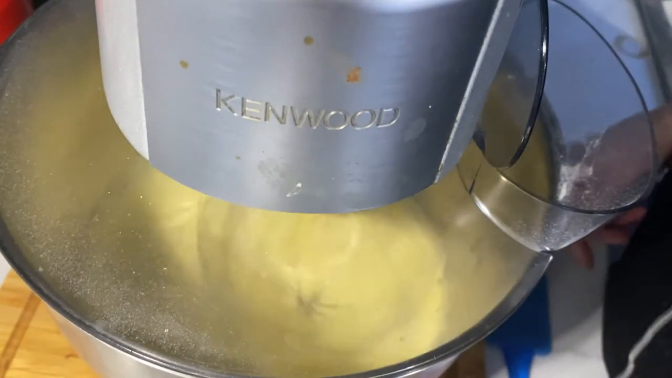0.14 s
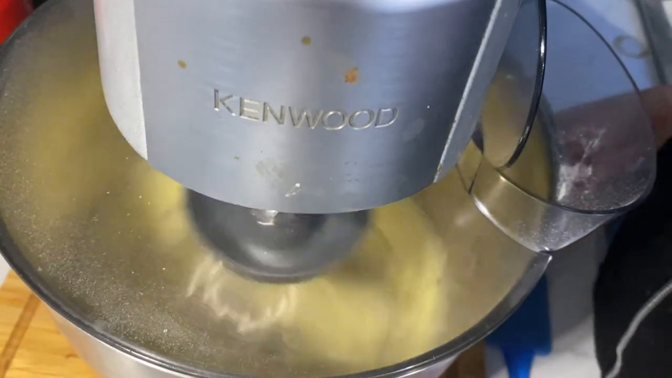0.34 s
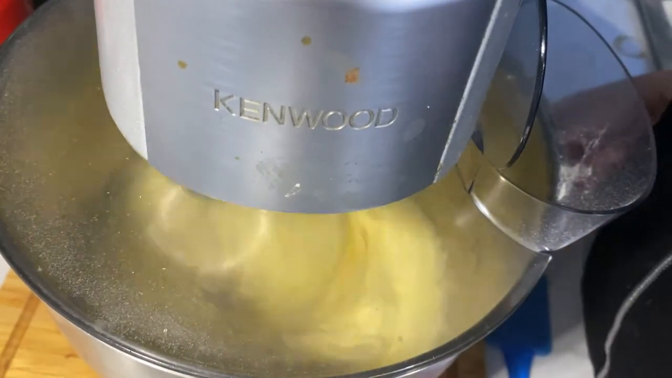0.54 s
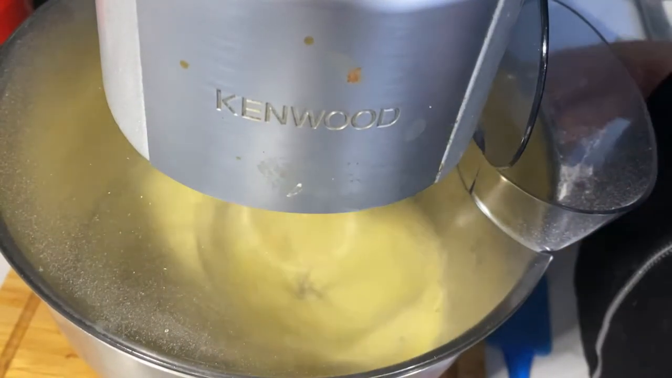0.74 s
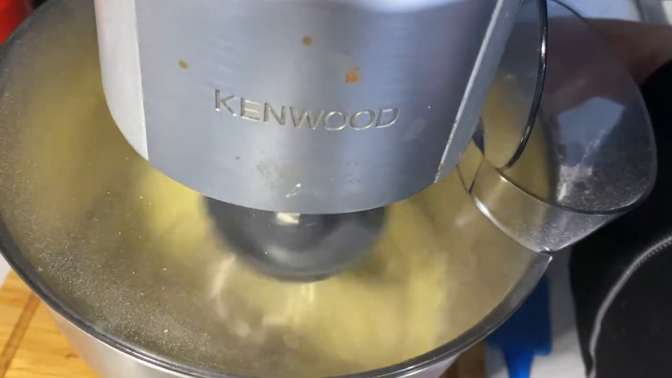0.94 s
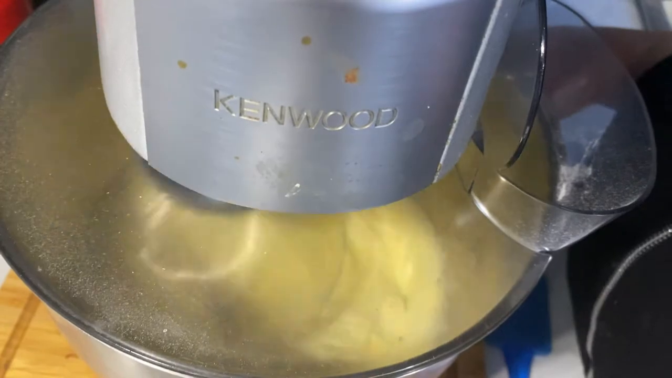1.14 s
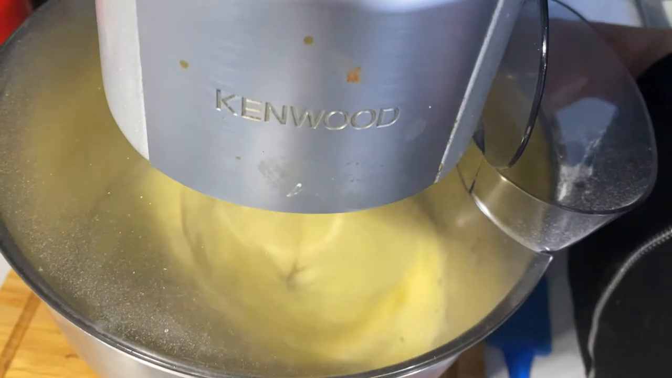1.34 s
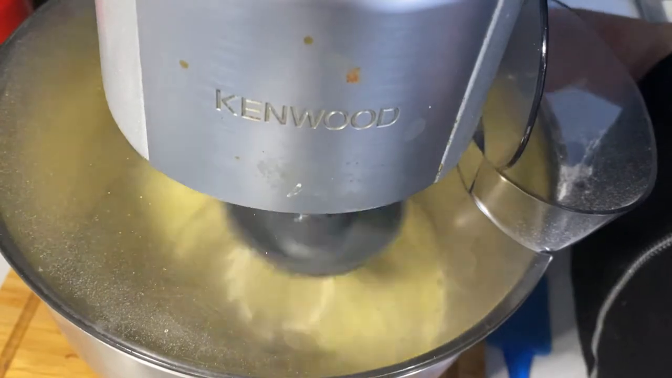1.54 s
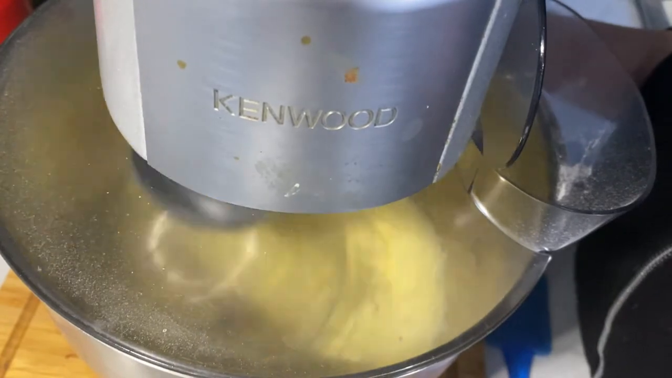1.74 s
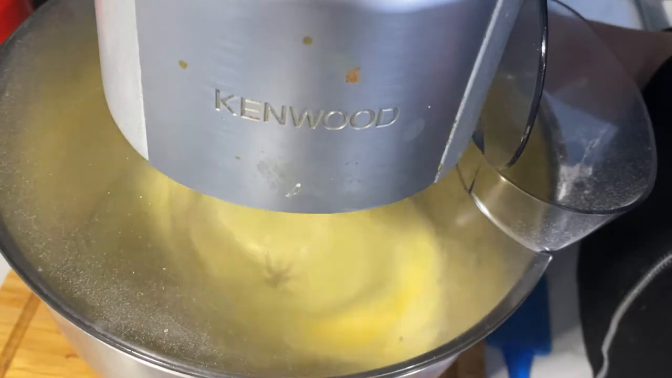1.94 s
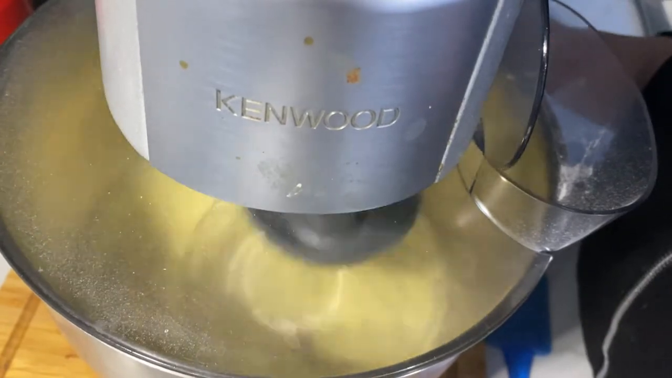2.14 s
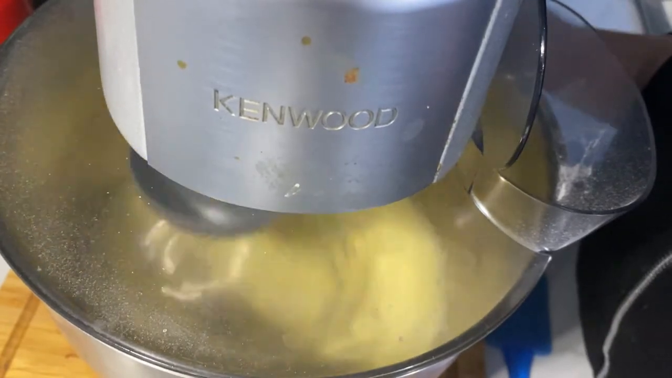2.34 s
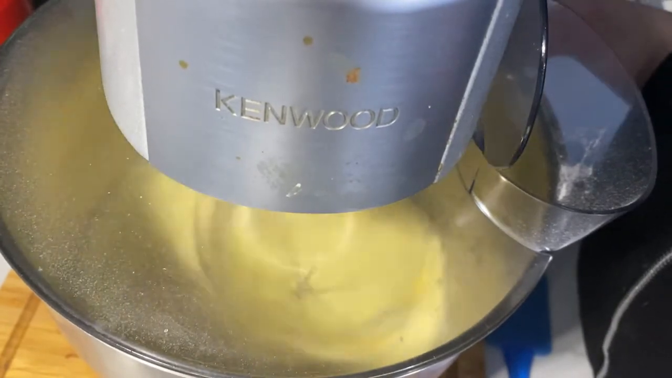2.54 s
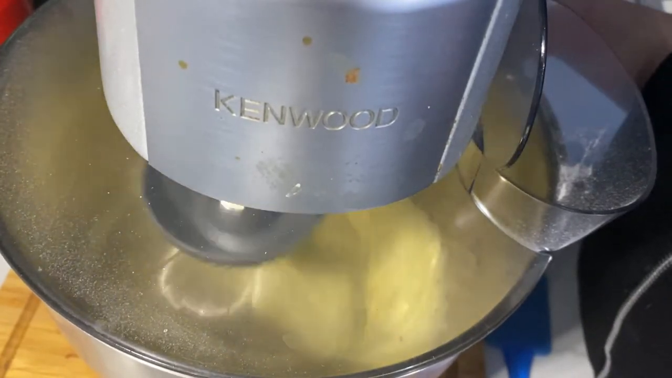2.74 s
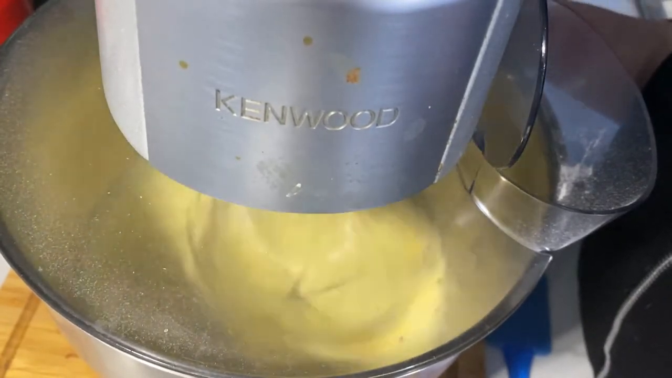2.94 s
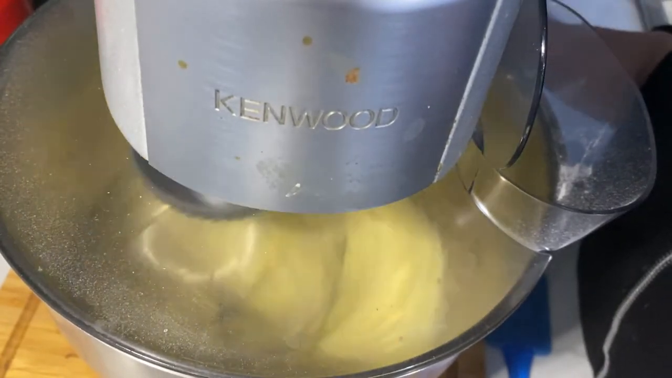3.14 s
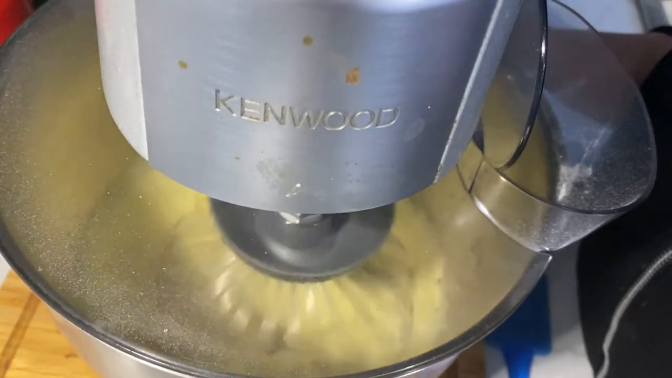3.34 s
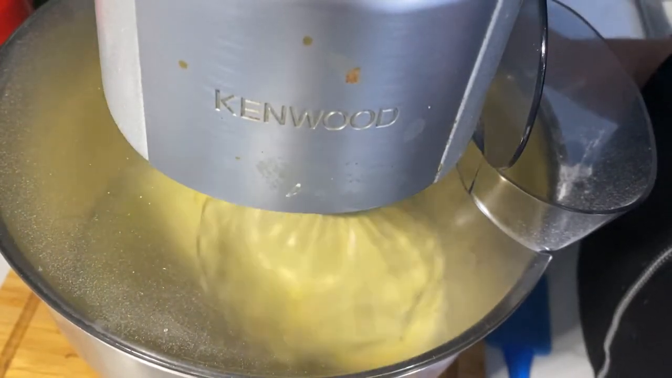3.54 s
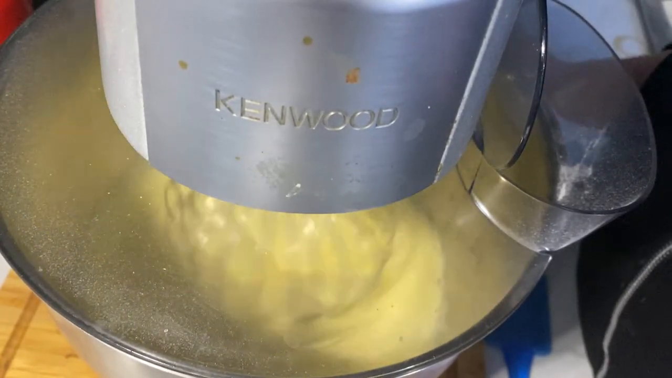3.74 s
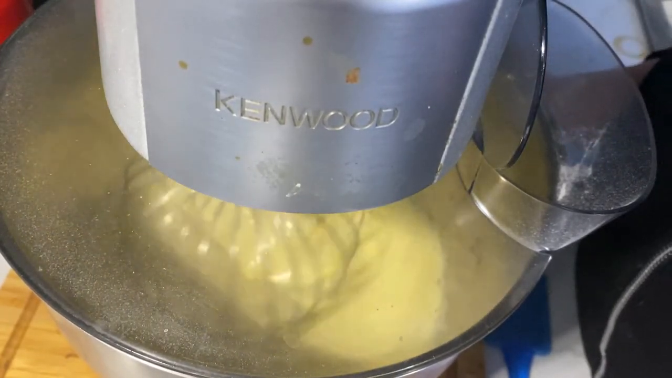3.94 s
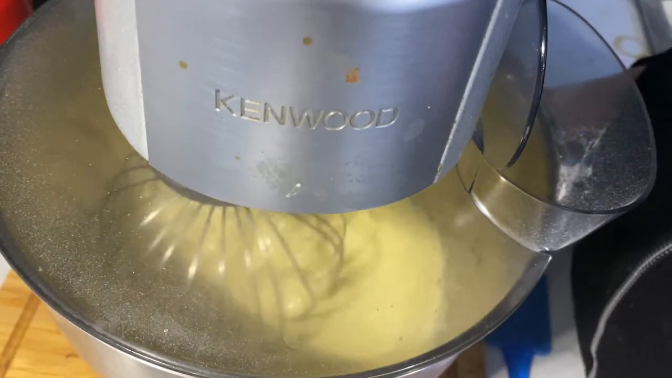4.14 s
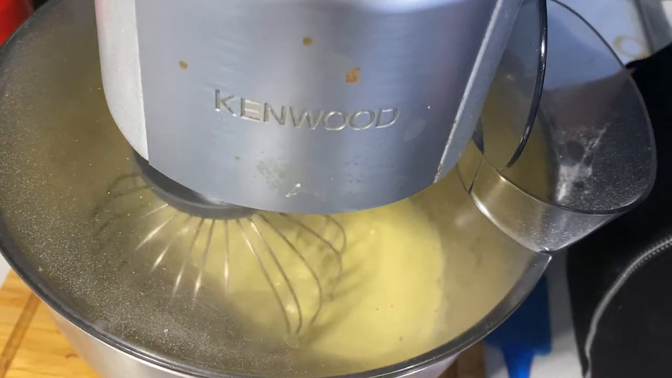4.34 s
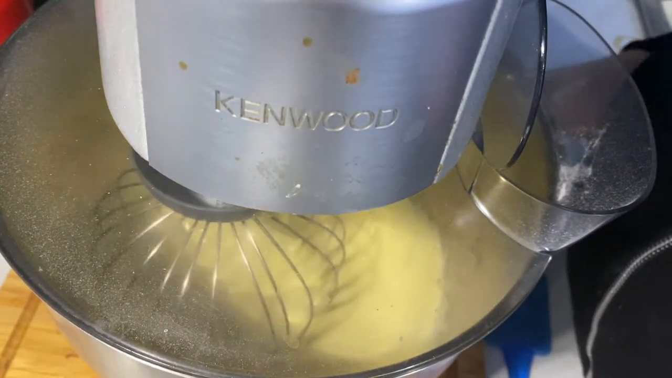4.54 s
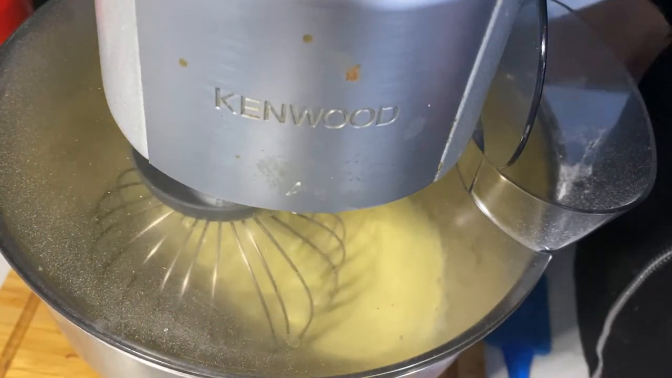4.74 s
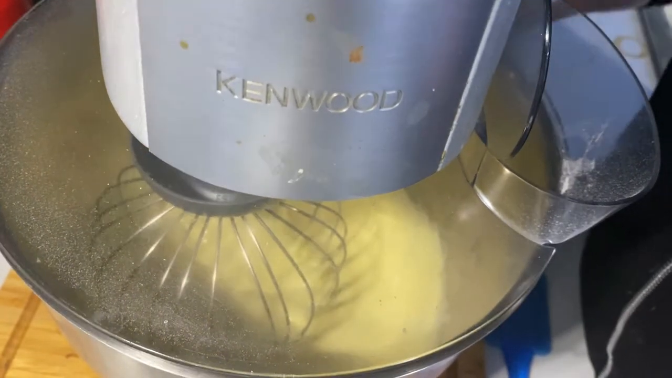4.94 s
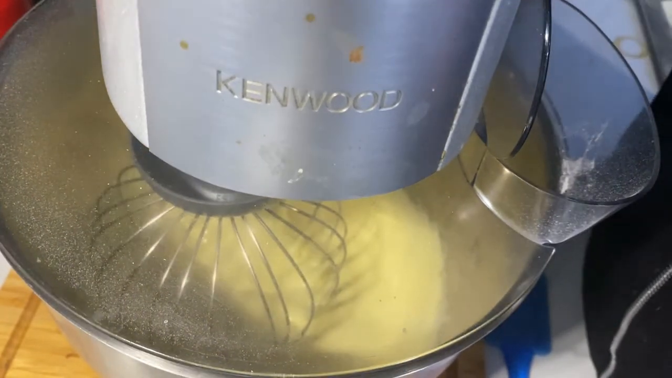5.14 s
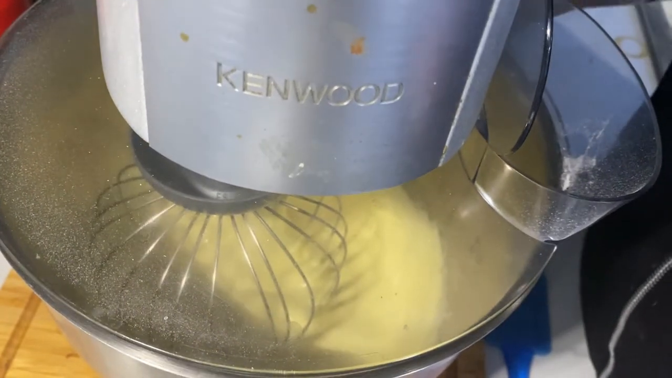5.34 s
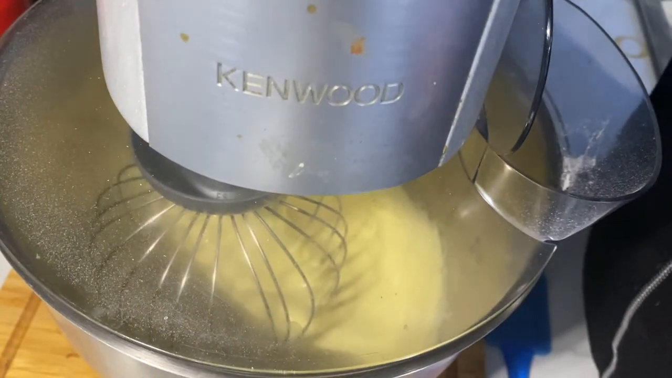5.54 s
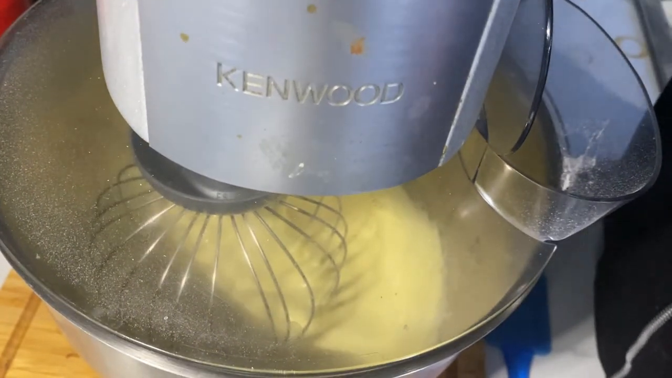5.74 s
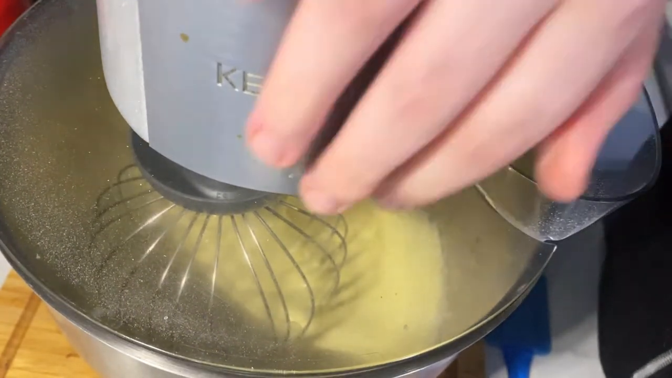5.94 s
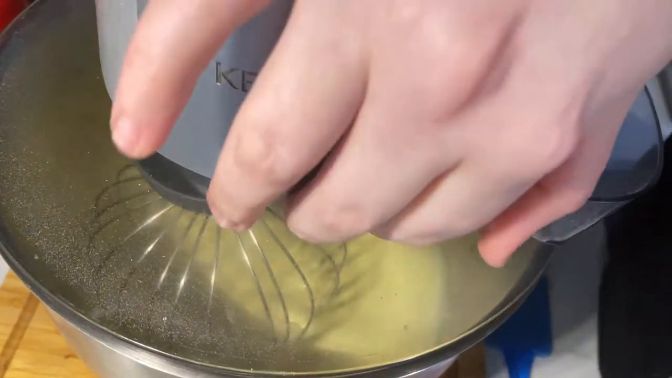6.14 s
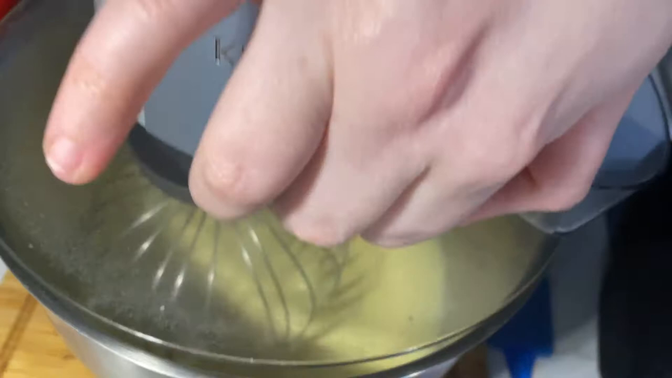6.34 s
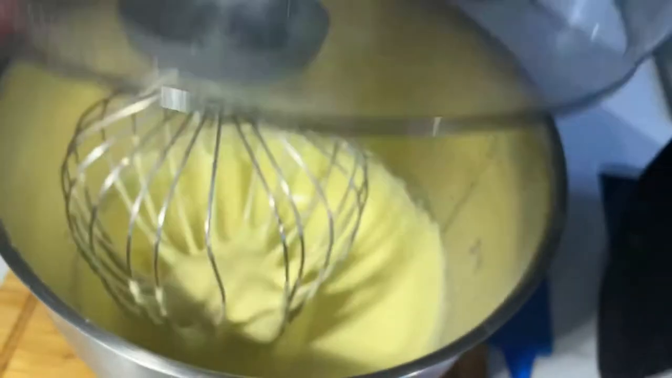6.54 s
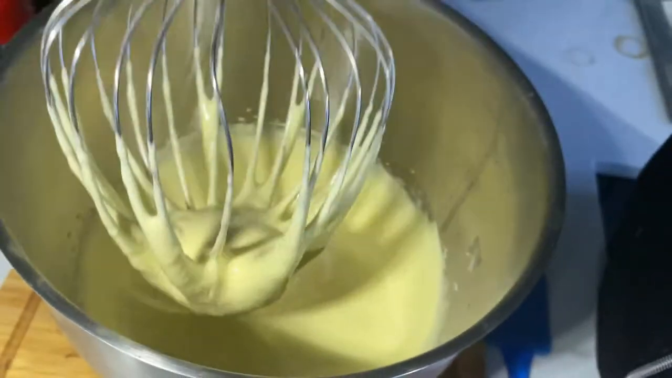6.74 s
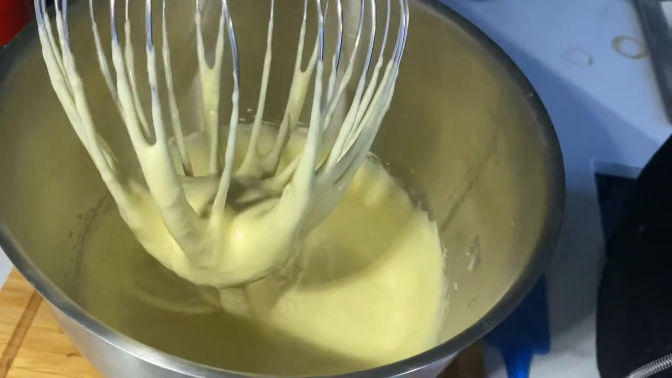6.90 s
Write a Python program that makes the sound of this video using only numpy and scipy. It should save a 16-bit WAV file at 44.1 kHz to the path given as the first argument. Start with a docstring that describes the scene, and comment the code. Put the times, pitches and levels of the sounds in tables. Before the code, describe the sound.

From the start, a stand mixer whisks batter at full speed, close by on a kitchen counter: a loud, steady roar with a motor whine, high hiss and low rumble. At about 2.3 seconds the power goes off. The whine weakens and slides down in pitch, and the roar gradually fades, with gear chatter, light ticking, a falling buzz and a brief low groan through the counter. A thin, high ring lingers until the motor stops at about 4.5 seconds. A run of small plastic dial clicks follows until 5 seconds, then a sharper click from the release catch at 5.3. From about 5.7 seconds, hands faintly rub the splash guard and casing, with soft low bumps. Around 6.7 seconds come a hollow knock, two light clicks and a short scrape as the head lifts. The room behind is very quiet.

```python
"""A stand mixer roars and whines at full speed, whisking batter on a kitchen counter.
Its spinning shaft drives the fan, gears and whisk and shakes the counter, so when the dial is turned
down the tones slide lower and the roar fades until the motor stops. Hands then click the release,
brush the casing and lift the head. It is all heard through a nearby phone's two microphone ports."""
import sys
import numpy as np
from scipy import signal
from scipy.fft import rfft, irfft
from scipy.io import wavfile
from scipy.ndimage import uniform_filter1d

SR = 44100
rng = np.random.default_rng(int(sys.argv[2]) if len(sys.argv) > 2 else 0)


def output_pcm(signal):
    """Save a mono or channel-first signal as 16-bit PCM at the path in sys.argv[1].

    Samples are clipped to [-1, 1] before scaling.
    """
    pcm = np.clip(np.atleast_2d(signal).T, -1, 1) * 32767
    wavfile.write(sys.argv[1], SR, np.round(pcm).astype(np.int16))


N = 311781
T = np.arange(N) / SR
HZ = np.arange(N // 2 + 1) * SR / N + 1e-3

# how fast the motor shaft spins: (time [s], speed [turns/s])
SHAFT_SPEED = [(0, 226.8), (2.27, 226.8), (2.44, 198), (2.62, 180), (2.78, 171), (2.95, 154), (3.11, 132),
               (3.27, 114.5), (3.54, 88), (3.7, 74), (3.906, 51), (4.092, 34.2), (4.2, 24.7), (4.26, 20.2),
               (4.3, 17.4), (4.38, 11), (4.48, .5)]
# tone colour of the roar, its hiss, its rumble and the quiet room: (frequency [Hz], level [dB])
ROAR_COLOUR = [(240, -39.5), (380, -6), (440, -8.5), (560, -6), (668, -3.5), (750, -5), (921, -3.5),
               (1430, -6), (2320, -5), (4190, -12), (7470, -9.5), (8600, -20.5), (11200, -93),
               (18900, -120)]
HISS_COLOUR = [(7000, -30), (8500, -33.5), (10000, 13), (12000, 11), (15000, 4.5), (16400, -4)]
RUMBLE_COLOUR = [(25, -53.5), (38, -17), (50, -15.5), (80, -2.5), (110, 1), (135, -11), (190, -0.5),
                 (260, -10.5), (340, -5.5), (450, -22), (600, -61.5)]
ROOM_COLOUR = [(120, -2.5), (200, -2.5), (591, -8), (2480, -17), (5580, -31), (8580, -35.5), (9000, -46.5),
               (11700, -46.5), (19800, -120)]
# where the casing, hollow head and splash guard ring: (frequency [Hz], width [Hz], boost [dB])
CASING_RINGS = [(506.5, 52, 11), (665, 24, 7.5), (917, 41, 6.5), (1185, 141, 8.5), (1623, 146, 7.5),
                (1852, 15, 11), (2012, 53, 8), (2980, 1800, 3), (3450, 180, 6), (4680, 120, 9.5),
                (5400, 50, 6), (6010, 87, 6.5), (7350, 1400, 1)]
HEAD_RINGS = [(930, 88, 12), (1140, 145, 10.5), (1726, 33, 9.5), (2070, 150, 8), (2490, 61, 8.5),
              (2730, 60, 5), (2940, 78, 5), (3590, 280, 5.5), (4020, 110, 7.5)]
GUARD_RINGS = [(615, 54, 17), (860, 85, 15), (1360, 50, 11), (1826, 21, 17), (2220, 50, 7.5), (2400, 27, 7),
               (2730, 32, 12), (3430, 45, 8)]
# tones that follow the shaft: (pitch [times the shaft speed], level [dB])
WHINE_TONES = [(.664, -12), (1.447, -18), (3, -20), (4, -12), (4.53, -21), (5.17, -24), (7, -13),
               (7.33, -21), (8, -18.5), (9, -24.5), (9.51, -21.5), (10, -15), (10.5, -17.5), (11.33, -23.5),
               (15.5, -20.5)]
GROAN_TONES = [(1.25, -37.5), (3, -43.5), (6.4, -45), (10.5, -52)]
# what the holder of the motor brushes lets through: (frequency [Hz], gain [dB])
BRUSH_HOLDER = [(500, -30), (800, -22), (1000, -9), (1200, -14), (1500, -18), (1780, -13), (1960, 0),
                (2150, -2), (2350, -14), (2550, -15), (2800, -24), (3100, -22), (4000, -32), (4700, -27),
                (5400, -33), (7000, -38), (9000, -48), (13000, -60)]
# where the counter shakes most easily: (frequency [Hz], width [Hz], level [dB])
COUNTER_RINGS = [(90.2, 20.7, -20.5), (117.7, 30.5, -23.5), (153, 20, -28), (184.1, 17, -25.5),
                 (208.3, 32.2, -27.5), (224.4, 20, -35.5)]
# strength of the magnetic hum: (time [s], level [dB])
HUM_LEVEL = [(0, -32), (2.2, -30), (2.4, -39), (2.87, -30), (2.95, -43), (3.1, -49), (3.3, -110)]
# pushes that rock counter and phone: (time [s], level [dB], fade time [s], upper band gain [dB])
PUSHES = [(3.6, -35, 1.8, -23), (4.031, -46, 1.4, 4), (4.3, -38, 0.6, -10.5), (4.53, -37.5, 0.61, -17),
          (4.707, -31.5, 0.3, -15), (4.82, -33.5, 1.14, -12), (4.92, -30, 0.24, -4),
          (5.17, -49, 0.13, -29.5), (5.27, -43.5, 1.2, -8), (5.34, -41, 0.32, -6), (5.76, -53.5, 0.52, 7),
          (5.86, -49, 0.18, -13), (6.31, -46.5, 0.89, -19.5), (6.4, -46.5, 6.3, -3.5),
          (6.72, -44.5, 0.42, 8), (6.83, -53, 1.7, -4)]
# clicks of the dial and of the catch that holds the head:
# (time [s], level [dB], thump gain [dB], ring gain [dB], extra gain for low rings [dB])
DIAL_CLICKS = [(4.515, -52.5, 16.5, -12, 0), (4.547, -47, 11, -12, -6), (4.637, -41.5, 0, -5, -18),
               (4.715, -61, 21, -8, 8), (4.754, -54, -2, -17, 0), (4.826, -52, 14, -3, -4),
               (4.886, -36.5, 3, -19, -5), (4.926, -30, -3, -4, 1), (4.958, -61, 15, 4, 2)]
CATCH_CLICKS = [(5.291, -56, 19, 6, 0), (5.337, -23.5, -8, -10.5, -2), (6.396, -58, 25, -11, 0),
                (6.706, -43, 10, -11, 0.28), (6.728, -39, 4, -13, 0)]
# how those two parts ring: (frequency [Hz], level [dB], fade time [s])
DIAL_RINGS = [(294.5, 14, 0.2), (300, -10, 1.4), (557, -2, 0.056), (918, 3, 0.041), (1070, -3.5, 0.044),
              (2100, -5, 0.04)]
CATCH_RINGS = [(302, -4, .15), (488, 6, 0.11), (937, -0.5, 0.057), (1098, -8, 0.24), (2010, -17, 0.036)]
# hands rub the casing, grip the guard and stir up hollow tones:
# (time [s], level [dB], fade time [s], middle frequency [Hz])
CASING_RUBS = [(5.15, -62, 0.7, 2230), (5.982, -60, 0.52, 9050), (6.12, -64.5, 0.53, 9050),
               (6.39, -64, 6.4, 1710), (6.41, -65.5, 3, 6550), (6.9, -67, 2.3, 6000),
               (6.70, -52, 0.246, 2500), (6.722, -40.5, 0.44, 3700), (6.84, -56.5, 4.4, 1400)]
GUARD_RUBS = [(5.65, -62, 0.81, 2400), (5.731, -44, 0.47, 2220), (5.731, -49, 0.35, 7850)]
HOLLOW_RUBS = [(6.41, -62, 0.15, 1160), (6.42, -66.5, 1.5, 2050), (6.42, -68, 1, 2750), (6.9, -66, 2, 2580),
               (6.74, -50, .3, 2800), (6.56, -50.5, 4.2, 182), (7.5, -48, .4, 192),
               (5.76, -53.5, 0.64, 564), (6.634, -35, 0.089, 372), (6.725, -44, 0.15, 3700),
               (6.69, -51.5, .2, 390), (6.82, -53, 1, 375), (6, -49, .3, 470)]
# how alike the two ports sound: (frequency [Hz], likeness [0-1])
PORT_LIKENESS = [(60, .985), (130, .95), (220, .85), (330, .2), (700, .3), (1400, .12), (3000, .3),
                 (6000, .5), (9000, .6)]
# how much louder the left port is: (frequency [Hz], left minus right [dB])
PORT_BALANCE = [(110, 0), (200, 2), (380, 1), (700, 4), (1290, 3), (2380, 4), (4400, 6), (7000, 5),
                (9000, 0)]

POWER_OFF_S, UNLOAD_S, STOP_S = 2.27, 0.067, 4.462
HUM_HZ, COMMUTATOR_BARS, TEETH_PER_TURN = 100.6, 20, 17.4
GRIND_BAND_HZ, SING_HZ, SING_WIDTH_HZ = (950, 1750), 4650, 260
COASTING = np.clip((T - POWER_OFF_S) / UNLOAD_S, 0, 1)  # 0 under power, 1 once it is off
STOP_FADE_DB = -20 * (np.clip(T - STOP_S, 0, 1) / 0.043) ** 2


def gain(db):
    """Turn decibels into a multiplier."""
    return 10 ** (np.asarray(db) / 20)

def since(start_s):
    """Seconds since a moment, zero before it."""
    return np.clip(T - start_s, 0, None)

def unit(x):
    """Scale a sound to an average (rms) strength of 1."""
    return x / np.sqrt(np.mean(x ** 2))

def over_hz(table):
    """Read a table at every frequency."""
    hz, value = np.transpose(table)
    return np.interp(np.log(HZ), np.log(hz + 1), value)

def drift(rate):
    """A smooth random wander of about 1 either way, with `rate` new values a second."""
    hold = int(SR / rate)
    steps = np.repeat(rng.standard_normal(N // hold + 1), hold)
    return 1.5 * uniform_filter1d(uniform_filter1d(steps, hold), hold)[:N]

def band(x, low_hz, high_hz):
    """Keep the sound between two frequencies."""
    edges = [max(low_hz, 20), min(high_hz, 20000)]
    return signal.sosfilt(signal.butter(2, edges, "band", fs=SR, output="sos"), x)

def colour(x, gains):
    """Give each frequency its own gain."""
    return irfft(rfft(x) * gains, N)

def peak(hz, middle_hz, width_hz, steepness=2):
    """A hump that is 1 in the middle and falls away on both sides."""
    return 1 / (1 + (2 * (hz - middle_hz) / width_hz) ** steepness)

def ringing(rings):
    """Gains of a part that boosts the frequencies it rings at."""
    return np.sqrt(1 + sum((gain(2 * db) - 1) * peak(HZ, hz, width) for hz, width, db in rings))

def swell(start_s, db, fade_s, rise_s=0.019):
    """Rise quickly, then die away; a fade time is how long a 60 dB drop takes."""
    return gain(db - 60 * since(start_s + rise_s) / fade_s) * np.clip(since(start_s) / rise_s, 0, 1)

def direction(lead_s=36e-6):
    """The left port is nearer, so it hears the mixer sooner and louder."""
    left = gain(over_hz(PORT_BALANCE) / 2) * np.exp(1j * np.pi * HZ * lead_s)
    return np.array([left, 1 / left])

def wide_noise(gains, pulse=1.):
    """Noise from a wide source: part reaches both ports alike, the rest differs."""
    alike = over_hz(PORT_LIKENESS)
    shared = colour(pulse * rng.standard_normal(N), np.sqrt(alike))
    separate = colour(pulse * rng.standard_normal((2, N)), np.sqrt(1 - alike))
    return colour(shared + separate, gains * direction())

def table_noise(table, pulse=1., shell=1.):
    """Wide noise coloured by a table, at a standard strength."""
    x = wide_noise(gain(over_hz(table)) * shell, pulse)
    return x / np.std(x.mean(axis=0))

def roar(turns, pace, hiss_db, casing):
    """Fan, gears and whisk make noise; as they slow, the top fades first, rumble and grind last."""
    # it throbs every second shaft turn and with each lap of the whisk
    throb = 1 + 0.15 * np.cos(np.pi * turns) + 0.046 * np.cos(2 * np.pi * turns / 35)
    body = table_noise(ROAR_COLOUR, throb * gain(0.28 * drift(14)), casing) * gain(0.4 * COASTING)
    top = colour(body, 1 / (1 + (2775 / HZ) ** 4))
    body += (gain(9.5 * pace) - 1) * top
    hiss = gain(hiss_db) * table_noise(HISS_COLOUR, gain(0.73 * drift(11)))
    rumble = gain(-2.5 - 6.5 * pace) * table_noise(RUMBLE_COLOUR)
    grind = unit(wide_noise(casing * np.abs(rfft(band(T == 0, *GRIND_BAND_HZ)))))
    grind_db = -19.5 - 24 * np.maximum(pace, np.log10(0.3)) + 2 * drift(40)
    return body + hiss + rumble + gain(grind_db) * grind

def whine(turns, roar_db):
    """Motor and gears whine under load; the whine drops when the power goes off."""
    tones = sum(gain(db + 1.5 * drift(18)) * np.sin(2 * np.pi * k * turns + .7 * drift(8))
                for k, db in WHINE_TONES)
    return gain(roar_db + 0.5 - 11 * COASTING - 3 * since(POWER_OFF_S)) * tones

def brush_buzz(speed, turns, jitter):
    """The brushes click over the motor's contact bars, and their holder colours the buzz."""
    phase = 2 * np.pi * COMMUTATOR_BARS * turns + jitter
    buzz = sum(np.cos(k * phase) * (k * COMMUTATOR_BARS * speed < 13000) for k in range(1, 13))
    db = -43 + 44 * np.log10(speed / np.hypot(speed, 25)) + STOP_FADE_DB  # holds until the shaft is slow
    return colour(buzz * gain(db + 2 * drift(60)), gain(over_hz(BRUSH_HOLDER)))

def gear_chatter(turns, roar_db, casing):
    """With the load off, loose gear teeth chatter more and ring the casing."""
    knock = sum(np.cos(np.pi * k * turns + 2.2 * drift(35)) for k in range(18, 27))
    slack_db = -30.5 + 12 * np.clip(since(POWER_OFF_S) / 0.58, 0, 1) - 8 * since(3.27)
    return colour(knock * gain(roar_db + slack_db), casing ** 2 * peak(HZ, 1790, 2 * 770))

def thin_ring(pace):
    """A thin, high ring lasts until the shaft stops."""
    ring = unit(band(rng.standard_normal(N), SING_HZ - SING_WIDTH_HZ / 2, SING_HZ + SING_WIDTH_HZ / 2))
    return ring * gain(-51 + 21 * pace + STOP_FADE_DB + 1.5 * drift(40))

def gear_whistle(speed, turns, db):
    """Overtones of the meeting gear teeth glide through a high resonance."""
    multiples = TEETH_PER_TURN * np.arange(4, 13)
    tones = sum(np.cos(2 * np.pi * k * turns) * peak(k * speed, 10300, 1700, 4) for k in multiples)
    return np.sqrt(2) * tones * gain(db + 2 * drift(30))

def counter_shake(speed, turns):
    """The unbalanced rotor shakes the counter, hardest at the speeds the counter rings at."""
    waver = gain(1.5 * drift(8) + 1.5 * drift(30))
    strength = sum(gain(db) * peak(speed, hz, width) ** 2 for hz, width, db in COUNTER_RINGS)
    return strength * waver * np.sin(2 * np.pi * turns + .35 * drift(25))

def magnetic_hum():
    """The motor's magnetism hums at twice the mains frequency."""
    db = np.interp(T, *np.transpose(HUM_LEVEL)) + drift(12)
    return gain(db) * np.sin(2 * np.pi * HUM_HZ * T + 0.35 * drift(10))

def gear_ticks(speed, turns, casing, turns_per_tick=3.66, one_tick_s=4.047):
    """A gear ticks once a lap, more softly while power presses the teeth together."""
    laps = np.floor((turns - turns[int(one_tick_s * SR)]) / turns_per_tick)
    ticks = (np.diff(laps, prepend=0) == 1) & (speed > 18)
    db = -25.5 - 7 * (1.5 - COASTING) + 5 * np.log10(speed / speed[0]) + 2.5 * rng.uniform(-0.79, 1, N)
    t = T[:1500]
    rattle = rng.standard_normal(len(t)) * gain(-60 * t / .08) * np.clip(t / .01, 0, 1)
    rattles = signal.fftconvolve(ticks * gain(db), rattle)[:N]
    ring_and_thud = ringing([(SING_HZ, SING_WIDTH_HZ, 6)]) * ringing([(330, 2 * 200, 13)])
    body = gain(.5 * over_hz(ROAR_COLOUR)) * ring_and_thud
    lows = gain(over_hz(RUMBLE_COLOUR) + 22)
    return colour(rattles, casing ** .75 * (body + lows))

def room_noise():
    """The faint, low background of the room."""
    air = colour(rng.standard_normal((2, N)), gain(over_hz(ROOM_COLOUR)))
    return gain(-65 + 2 * drift(1.9)) * unit(air)

def sway(rest_db=-51.5):
    """Counter and phone wobble faintly all along, and rock after each push."""
    low = unit(band(band(rng.standard_normal(N), 32.6, 106), 40, 130))
    upper = unit(band(rng.standard_normal((2, N)) * 0.75 + rng.standard_normal(N), 113, 308))
    low_power, upper_power = gain(rest_db) ** 2, gain(rest_db - 16) ** 2
    for start_s, db, fade_s, upper_db in PUSHES:
        low_power += swell(start_s, db, fade_s) ** 2
        upper_power += swell(start_s, db + upper_db, fade_s) ** 2
    return np.sqrt(low_power) * low + np.sqrt(upper_power) * upper

def tooth_tones(turns, pace, jitter, casing):
    """While coasting, the lowest gear tooth tones slide down through the casing's resonances."""
    tones = sum(np.cos(2 * np.pi * k * TEETH_PER_TURN * turns + jitter) for k in (1, 1.5, 2, 3))
    tones *= COASTING * gain(-49 + 15 * pace + STOP_FADE_DB)
    return colour(band(tones, *GRIND_BAND_HZ), casing)

def base_groan(speed, turns):
    """Falling shaft tones groan as they pass the pitch the mixer's base rings at."""
    return COASTING * sum(
        gain(db + 2.3 * drift(25)) * np.sin(2 * np.pi * k * turns + 0.68 * drift(30))
        * peak(k * speed, 202, 46) for k, db in GROAN_TONES)

def moan(turns, start_s=3.08, end_s=3.42):
    """A second, higher hum briefly falls along with the shaft."""
    db = -33.5 - 398 * np.clip(start_s - T, 0, None) - 158 * since(end_s)
    return gain(db + 4 * drift(22)) * np.sin(2 * np.pi * 1.8 * turns + .9 * drift(30))

def clicks(table, rings, low_ring_hz=520):
    """Each click is a short crack, a ring of the plastic part and a thump through the counter."""
    out, t = np.zeros((2, N)), T[:SR // 3]
    pan_db = np.array([[3.5], [-3.5]]) / 2
    for start_s, db, thump_db, ring_db, low_db in table:
        crack_noise, thump_noise, scatter = rng.standard_normal((3, len(t)))
        burst = crack_noise * gain(-60 * t / 0.047) * np.clip(t / 0.0014, 0, 1)
        treble = gain(1 + .8 * db) * band(burst, 5800, 12000)  # harder clicks are brighter
        crack = band(band(burst, 500, 4000), 540, 5700) + treble
        ring = 0
        for k, (hz, tone_db, fade_s) in enumerate(rings):
            fade = gain(tone_db + low_db * (hz < low_ring_hz) + 2 * scatter[k] - 60 * t / fade_s)
            ring += fade * np.sin(2 * np.pi * hz * (1 + 0.0024 * scatter[k + 20]) * t)
        thump = band(thump_noise * gain(-60 * t / 0.18), 49, 226)
        hit = crack / np.abs(crack).max() + gain(ring_db) * ring / 2
        hit += gain(thump_db) * thump / np.abs(thump).max()
        i = int(start_s * SR)
        out[:, i:i + len(t)] += (gain(db - 6 + pan_db) * hit)[:, :N - i]
    return colour(out, ringing(HEAD_RINGS))

def kitchen_echo(x, fade_s=0.29):
    """Add a fading tail of reflections, different at each port."""
    t = T[:SR // 2]
    tail = rng.standard_normal((2, len(t))) * gain(-60 * t / fade_s) * (t > .004)
    tail /= np.sqrt(np.sum(tail[0] ** 2))
    return x + gain(-6) * signal.fftconvolve(x, tail, axes=1)[:, :N]

def hand_rubs(table, rings, width_share=1.15, extra_width_hz=0):
    """Hands make grainy friction noise, coloured by the hollow part; narrow bands sound like tones."""
    out = 0
    for start_s, db, fade_s, hz in table:
        reach_hz = (hz * width_share + extra_width_hz) / 2
        noise = rng.standard_normal(N) + 1.86 * rng.standard_normal((2, N))
        rub = unit(band(noise, hz - reach_hz, hz + reach_hz))
        out += swell(start_s, db, fade_s) * gain(1.2 * drift(70)) * rub
    return colour(out, ringing(rings))

def scene():
    """One shaft drives the mixer's sounds; the hands, the sway and the room are added to them."""
    speed = np.interp(T, *np.transpose(SHAFT_SPEED))
    turns = np.cumsum(speed * (1 + 0.0011 * drift(9))) / SR
    share = speed / speed[0]
    pace = np.log10(np.hypot(share, 0.066))  # 0 at full speed, about -1.2 when only rubbing is left
    roar_db = -25.5 + 30 * pace + STOP_FADE_DB
    hiss_db = -18.5 + 10 * np.log10(share)  # relative to the roar
    casing, jitter = ringing(CASING_RINGS), .17 * drift(150)
    noise = gain(roar_db) * roar(turns, pace, hiss_db, casing)
    tones = whine(turns, roar_db) + counter_shake(speed, turns) + magnetic_hum()
    tones += base_groan(speed, turns) + moan(turns)
    buzz = brush_buzz(speed, turns, jitter) + thin_ring(pace)
    gears = gear_chatter(turns, roar_db, casing) + gear_whistle(speed, turns, roar_db + hiss_db - 4.5)
    gears += gear_ticks(speed, turns, casing) + tooth_tones(turns, pace, jitter, casing)
    mixer = noise + colour(np.sqrt(2) * tones + buzz + gears, direction())
    hands = kitchen_echo(clicks(DIAL_CLICKS, DIAL_RINGS) + clicks(CATCH_CLICKS, CATCH_RINGS))
    hands += hand_rubs(CASING_RUBS, HEAD_RINGS) + hand_rubs(GUARD_RUBS, GUARD_RINGS)
    hands += hand_rubs(HOLLOW_RUBS, HEAD_RINGS, width_share=0.046, extra_width_hz=70)
    return mixer + hands + sway() + room_noise()

def record(dry):
    """The phone cuts the treble above 16 kHz."""
    return signal.sosfilt(signal.ellip(8, .2, 70, 16000, fs=SR, output="sos"), dry)


dry = scene()
out = record(dry)
output_pcm(out)
```